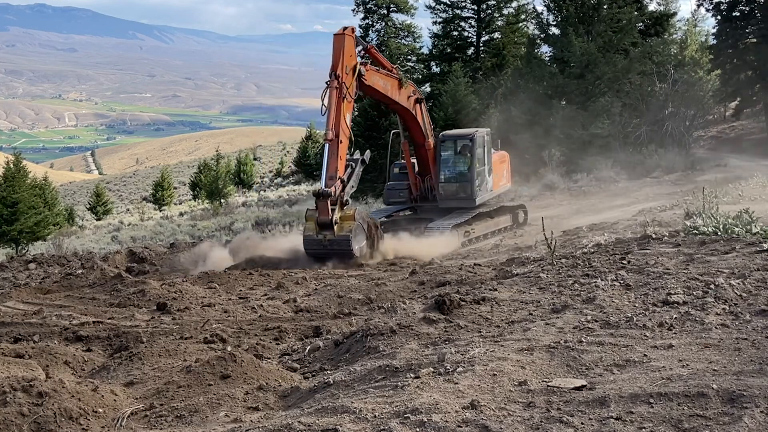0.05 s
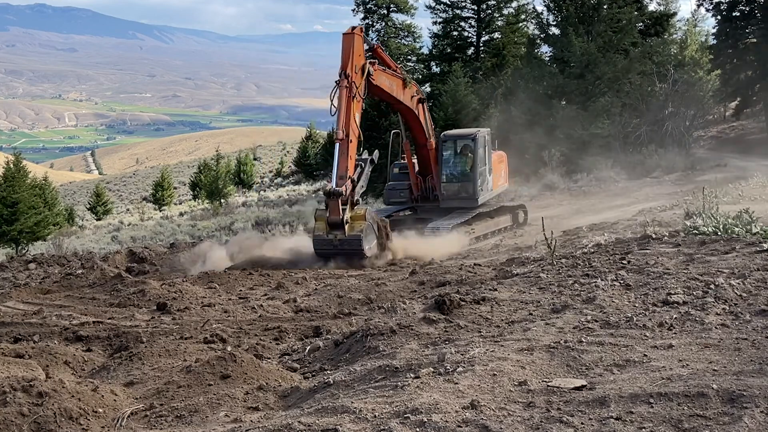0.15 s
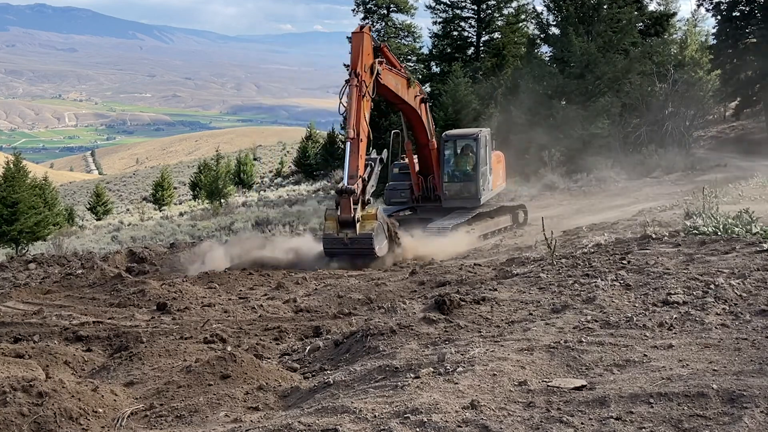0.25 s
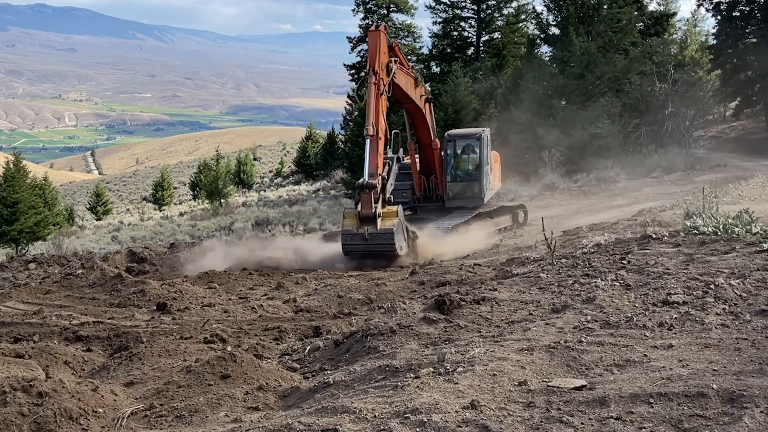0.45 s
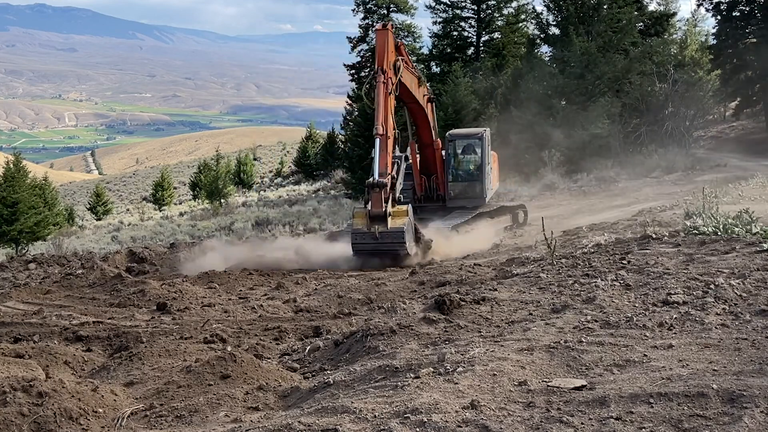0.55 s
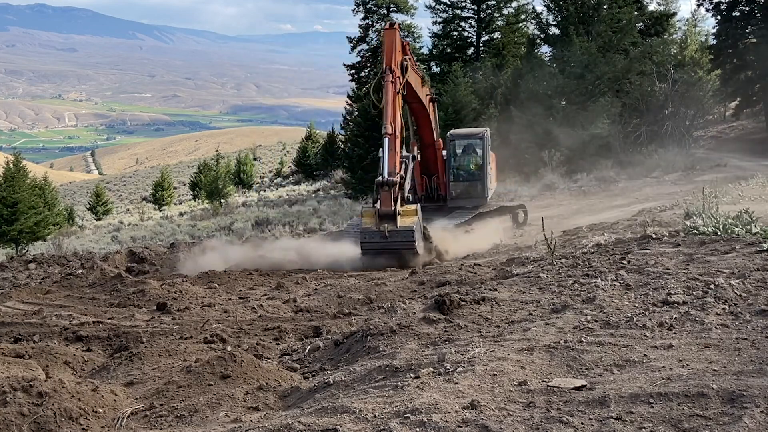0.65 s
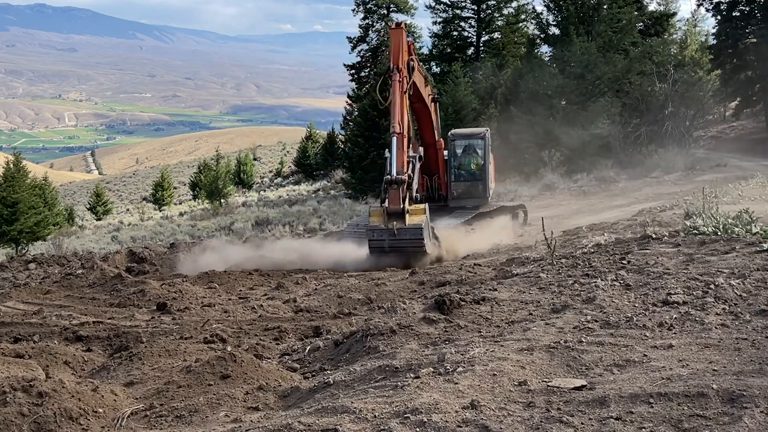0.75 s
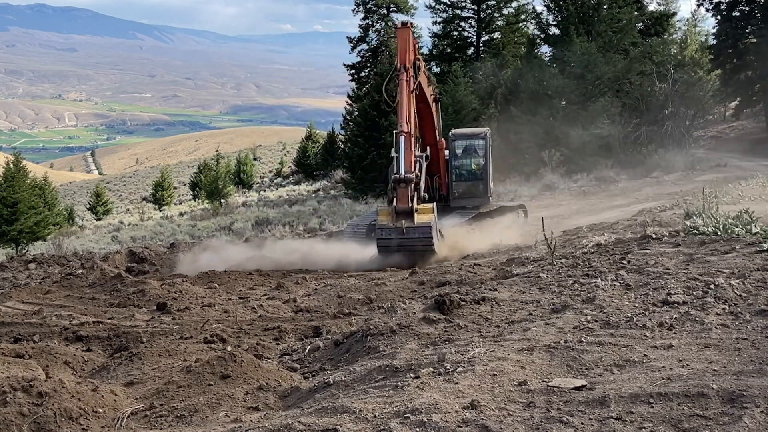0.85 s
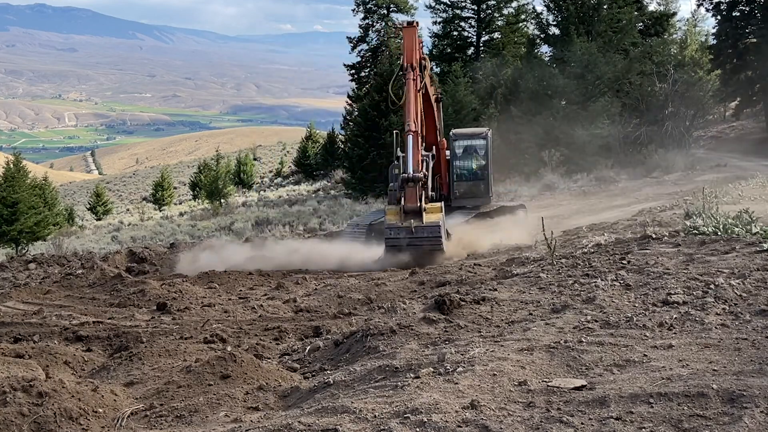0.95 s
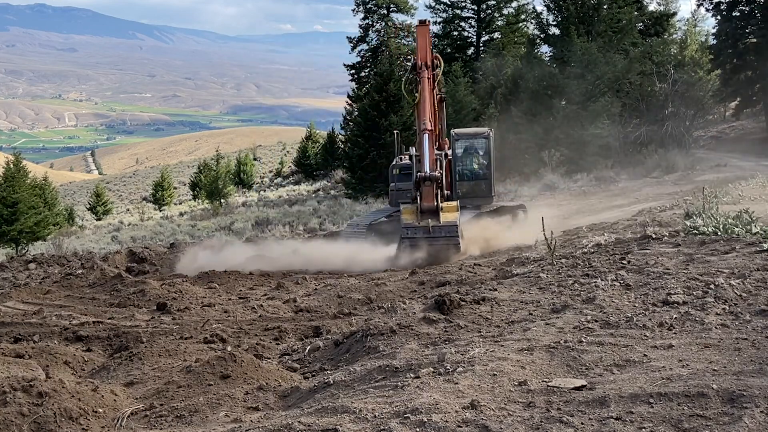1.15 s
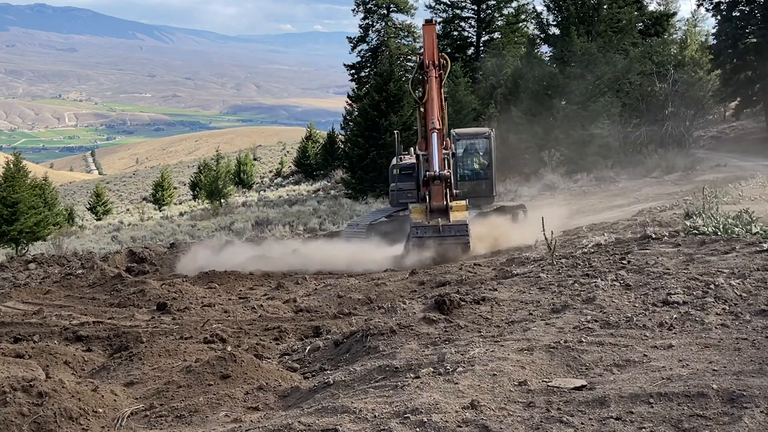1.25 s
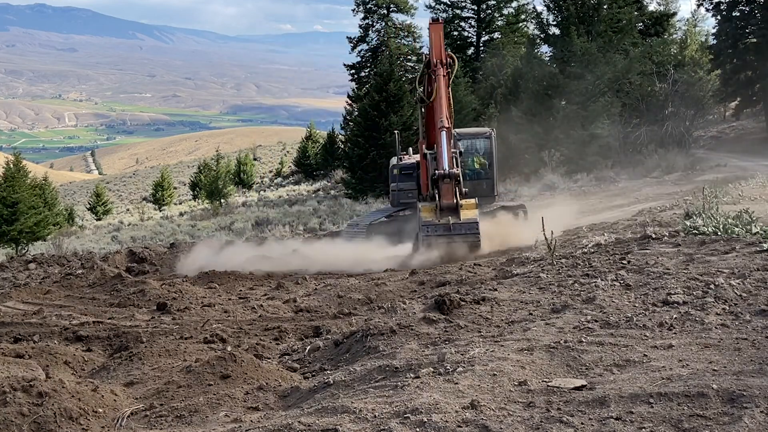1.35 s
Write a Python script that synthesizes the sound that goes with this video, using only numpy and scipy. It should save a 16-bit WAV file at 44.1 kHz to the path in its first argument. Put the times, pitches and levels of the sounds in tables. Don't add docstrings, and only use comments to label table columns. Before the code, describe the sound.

An excavator bucket scrapes stony soil: light gritty ticks, then a loud hollow clank and crunch, then overlapping knocks and grinding that thin out, over a faint diesel throb, heard outdoors from some distance.

```python
import sys
import numpy as np
from scipy import signal
from scipy.io import wavfile

SR = 44100
rng = np.random.default_rng(int(sys.argv[2]) if len(sys.argv) > 2 else 0)


def wrap_up_sound(samples):
    columns = np.atleast_2d(samples).T
    tamed = np.clip(columns, -1, 1)
    steps = np.round(tamed * 32767).astype(np.int16)
    wavfile.write(sys.argv[1], SR, steps)


def makeup_ratio(level_db):
    decades = np.asarray(level_db, float) / 20
    return 10 ** decades


N = 61739
TIME_S = np.arange(N) / SR


def rms_one(x):
    return x / np.sqrt(np.mean(x ** 2) + 1e-20)


def at_hz(points, hz):
    table_hz, value = np.transpose(points)
    return np.interp(np.log(hz), np.log(table_hz), value)


def drift(rate_hz):
    pole = np.exp(-2 * np.pi * rate_hz / SR)
    wander = signal.lfilter([1], [1, -2 * pole, pole ** 2], rng.standard_normal(N + SR))
    return rms_one(wander[SR:])


def ring(x, hz, t60_s):
    radius = makeup_ratio(-60 / (t60_s * SR))
    angle = 2 * np.pi * hz / SR
    poles = [1, -2 * radius * np.cos(angle), radius ** 2]
    return signal.lfilter([0, np.sin(angle)], poles, x + 1e-18)


def band_pass(low_hz, high_hz):
    return signal.butter(2, [low_hz, high_hz], "band", fs=SR, output="sos")


def bands(low_hz, count):
    edges_hz = low_hz * 2 ** (np.arange(count + 1) / 3)
    return [(np.sqrt(a * b), band_pass(a, b)) for a, b in zip(edges_hz, edges_hz[1:])]


def blow(since_s, rise_s, t60_s):
    attack = np.clip(since_s / rise_s, 0, 1) ** 0.68
    return attack * makeup_ratio(-60 * np.maximum(since_s - rise_s, 0) / t60_s)


def grains():
    grains_per_s, spread_db = 9000, 2.5
    size = makeup_ratio(spread_db * np.minimum(rng.exponential(1, N), 5))
    sign = rng.choice([-1, 1], N)
    return rms_one(size * sign * (rng.random(N) < grains_per_s / SR))


def knocks(rows, rise_cycles):
    start_s, level_db, pitch_hz, t60_s = np.array(rows).T[:, :, None]
    since_s = TIME_S - start_s
    envelope = makeup_ratio(level_db + 3.5) * blow(since_s, rise_cycles / pitch_hz, t60_s)
    return np.sum(envelope * np.sin(2 * np.pi * pitch_hz * since_s), axis=0)


# start_s, level_db, rise_s, tilt_db_per_octave, ring_db
STRIKES = [(0.063, -48, 0.0026, -2.5, -8), (0.111, -51, 0.0043, -2.5, -6), (.164, -83, 0.0047, -12, 0),
           (0.218, -37.5, 0.0012, 0, -8), (.24, -42, 0.0061, 3, -17), (0.259, -38, .005, 3, -17),
           (0.376, -46.5, 0.0014, -2, -22), (0.428, -38, 0.012, -6.5, -27), (.441, -27, 0.015, 3, -8),
           (0.477, -36, 0.011, -2.5, -3), (0.518, -42, 0.006, 2, -4), (0.587, -41, 0.02, -3, -6),
           (.605, -42, .02, -5, -6), (0.643, -33.5, 0.019, 1, -8), (0.69, -31.5, 0.0019, 1.5, -2.5),
           (0.719, -38, 0.0026, -4.5, -1.5), (.799, -37.5, 0.0066, 0.5, -12), (0.822, -37, 0.012, 1.5, -20),
           (0.843, -37, 0.0088, 1.5, 3.5), (0.868, -39, .01, .7, -9), (.913, -50, 0.004, 1, -12),
           (1.074, -42, 0.008, 4, -14), (1.115, -46, 0.0018, -.7, -14), (1.142, -52, .008, 2.5, -14),
           (1.172, -53, .01, -2, -10)]
# pitch_hz, level_db_per_hz
GRIT_COLOUR = [(150, -10), (450, -10.5), (720, -4.5), (1630, -10.5), (3650, -15.5), (4600, -33),
               (7200, -34), (15700, -86)]
# pitch_hz, t60_s
GRIT_DECAY = [(150, 0.52), (700, 0.62), (2500, 0.15), (6000, 0.23), (15000, 0.023)]


def grit():
    low_lag_rises_per_octave = 0.56
    tail_db, tail_dull_db_per_octave, tail_t60_s = -12.5, 0.5, 0.99
    air_loss_hz = 8890
    start_s, level_db, rise_s, tilt_db, _ = np.array(STRIKES).T[:, :, None]
    t = np.arange(0, N + 16, 16) / SR
    source = [grains(), grains()]
    out, power = 0, 0
    for k, (hz, sos) in enumerate(bands(145.4, count=21)):
        octaves = np.log2(hz / 1500)
        since_s = t - start_s - low_lag_rises_per_octave * rise_s * max(-octaves, 0)
        gain = makeup_ratio(level_db + tilt_db * octaves + rng.normal(0, 1.62, (len(STRIKES), 1)))
        burst = blow(since_s, rise_s, at_hz(GRIT_DECAY, hz))
        tail = makeup_ratio(tail_db - tail_dull_db_per_octave * octaves) * blow(since_s, rise_s + 0.0048, tail_t60_s)
        tail_power = tail ** 2 / (1 + (hz / air_loss_hz) ** 10.0)
        envelope = np.sqrt(np.sum(gain ** 2 * (burst ** 2 + tail_power), axis=0))
        band = makeup_ratio(at_hz(GRIT_COLOUR, hz)) * signal.sosfilt(sos, source[k % 2])
        out = out + band * np.interp(TIME_S, t, envelope) * makeup_ratio(1.55 * drift(32.0))
        power += np.mean(band ** 2)
    return out / np.sqrt(power)


# pitch_hz, level_db, t60_s
BUCKET_MODES = [(502, -12, 0.18), (536, -9, 0.16), (592.6, -4, 0.24), (711, -8, 0.18), (734, -16, 0.35),
                (789, -19, 0.3), (842, -9, 0.1), (968, -6, 0.17), (1114, -1, 0.072), (1262, -2, 0.13),
                (1456, -6.5, 0.14), (1555, -10.5, 0.15), (1683, -18, 0.087), (3693, -28, 0.16)]


def bucket():
    bucket_db = -25
    upper_db, upper_fall_db_per_octave, upper_t60_s = -14.5, 14, 0.051
    start_s, level_db, rise_s, tilt_db, ring_db = np.array(STRIKES).T[:, :, None]
    since_s = TIME_S - start_s
    rattle = grains() * makeup_ratio(level_db + ring_db + bucket_db)
    late = blow(since_s - 0.68 * rise_s, rise_s, 0.051) * rattle
    prompt = blow(since_s, rise_s, 0.05) * rattle
    out = np.zeros(N)
    strengths_db = rng.normal(0, 4.2, (len(STRIKES), len(BUCKET_MODES)))
    for k, (hz, mode_db, t60_s) in enumerate(BUCKET_MODES):
        out += ring(makeup_ratio(mode_db + strengths_db[:, k]) @ late, hz, t60_s)
    upper_hz = np.geomspace(1400, 9000, 40) * rng.uniform(.98, 1.02, 40)
    upper_strengths_db = rng.normal(0, 3, (len(STRIKES), 40)).T
    for hz, strength_db in zip(upper_hz, upper_strengths_db):
        slope_db = (tilt_db[:, 0] - upper_fall_db_per_octave) * np.log2(hz / 1800)
        drive = makeup_ratio(upper_db + slope_db + strength_db) @ prompt
        out += ring(drive, hz, upper_t60_s * (1800 / hz) ** 0.41)
    return out


# start_s, level_db, pitch_hz, t60_s
CLANKS = [(.062, -42, 559, 0.068), (.062, -51, 702, 0.14), (.066, -49.5, 1250, .1),
          (.068, -51.5, 735, 0.47), (.118, -45, 777, 0.14), (.125, -45, 739.5, 0.87),
          (.217, -36, 555, 0.078), (.217, -41, 718, 0.099), (.245, -45.5, 734, 1.13),
          (.262, -40, 1940, .06), (.222, -43, 1150, .12), (.268, -45.5, 592.7, 0.33),
          (.466, -28.5, 708, 0.14), (.443, -35, 1040, .08), (.445, -33.5, 1487, 0.13),
          (.447, -34, 1921, .12), (.453, -31.5, 1156, 0.12), (.458, -34.5, 983, 0.19),
          (.456, -35, 522, 0.063), (.468, -31.5, 532, 0.27), (.478, -29, 843, 0.15),
          (.488, -31.5, 786, .12), (.512, -37, 927, .1), (.512, -34.5, 715, 0.093), (.552, -36, 668, 0.17),
          (.585, -39.5, 504, 0.078), (.592, -44, 778, 0.18), (.603, -35.5, 670, 0.087),
          (.608, -40.5, 1258, 0.36), (.6, -43, 983, 0.21), (.655, -38.5, 1028, .15),
          (.671, -36.5, 557, 0.12), (.69, -37.5, 1856, 0.18), (.69, -44.5, 1120, 0.21),
          (.815, -42, 1312, 0.25), (.845, -39, 998, .1), (.866, -37.5, 910, 0.11), (.87, -39, 673, 0.14),
          (.872, -42.5, 1396, 0.14), (.872, -41, 1262, 0.13), (.71, -34, 540, 0.088),
          (.903, -41, 733, 0.48), (.84, -43, 602, .15), (.93, -47, 546, 0.17), (.915, -45, 778, 0.14),
          (1.122, -44, 1114, 0.15), (1.118, -46.5, 1820, 0.1)]


def clanks():
    return knocks(CLANKS, rise_cycles=0.74)


# start_s, level_db, pitch_hz, t60_s
THUDS = [(0.261, -42, 217.7, 0.17), (0.357, -38.5, 85, 0.25), (.456, -25.5, 248, 0.078),
         (.464, -24, 264, 0.051), (.454, -29.5, 154, 0.1), (0.459, -35.5, 80, 0.3),
         (.472, -31.5, 300, 0.23), (.53, -38, 197, 0.083), (.452, -32.5, 374, 0.094),
         (0.54, -35.5, 80, 0.21), (.585, -33, 89, 0.19), (0.641, -32, 207, 0.11), (0.691, -30.5, 99, 0.1),
         (0.69, -27.5, 256, 0.063), (0.716, -29.5, 288, 0.1), (0.809, -36.5, 76.6, 0.26),
         (0.843, -30.5, 262, 0.054), (.863, -29.5, 250, 0.063), (.85, -29, 192.5, 0.095),
         (0.884, -32, 148, 0.093), (1.2, -41, 195.6, 0.16), (1.078, -46, 312, 0.08),
         (0.12, -46.5, 290, 0.09), (0.29, -44, 330, 0.065), (1.158, -40.5, 215, 0.062),
         (1.13, -46.5, 307, .15), (.8, -39, 160, 0.11)]


def thuds():
    return knocks(THUDS, rise_cycles=0.9)


# start_s, level_db, centre_hz, t60_s
CRACKS = [(.261, -36, 2600, 0.045), (0.224, -45.5, 2800, 0.12), (.652, -44, 3460, 0.12),
          (.712, -41, 2200, .07), (.441, -30, 1650, 0.16), (0.453, -28.5, 2130, 0.1),
          (0.61, -44.5, 2600, 0.065), (0.94, -49, 2800, 0.13), (1.2, -67, 8200, 0.085),
          (.845, -43, 2900, 0.067), (.803, -47, 2400, .06), (0.4, -55, 5600, .3), (1.117, -46, 2100, 0.032)]


def cracks():
    source, out = grains(), 0
    for start_s, level_db, centre_hz, t60_s in CRACKS:
        burst = rms_one(signal.sosfilt(band_pass(centre_hz / 1.56, centre_hz * 1.454), source))
        out = out + makeup_ratio(level_db) * blow(TIME_S - start_s, 0.0047, t60_s) * burst
    return out


# start_s, length_s, pitch_hz, level_db
SQUEAKS = [(.232, .014, 6100, -58), (.245, .03, 6800, -57), (.245, .008, 10400, -66),
           (.453, .008, 7000, -50), (.53, .012, 6000, -63), (.652, .03, 7600, -65),
           (.655, .025, 14700, -78), (.655, .016, 10500, -69), (.703, .035, 9750, -66),
           (.805, .015, 15200, -80), (.845, .11, 9750, -72), (.918, .022, 13500, -84),
           (1.08, .02, 7700, -64), (.692, .012, 7200, -58), (.71, .07, 3700, -56), (.85, .04, 3700, -58),
           (.755, .03, 3700, -60), (1.08, .03, 5400, -63), (1.118, .01, 7200, -65), (.46, .02, 3100, -42)]


def squeaks():
    width_hz = 200
    t60_s = np.log(1000) / (np.pi * width_hz)
    out = 0
    for start_s, length_s, pitch_hz, level_db in SQUEAKS:
        noise = rng.standard_normal(N)
        tone = rms_one(ring(ring(noise, pitch_hz, t60_s), pitch_hz, t60_s))
        grip = np.clip((TIME_S - start_s) / .002, 0, 1)
        release = np.clip((start_s + 1.2 * length_s - TIME_S) / length_s, 0, 1)
        out = out + makeup_ratio(level_db + 2) * tone * grip * release
    return out


# start_s, level_db
LOAD = [(0, -49.5), (0.041, -52), (.08, -47), (.19, -67), (.27, -41), (.33, -52), (.45, -46), (.65, -45),
        (.85, -43.5), (1.0, -42), (1.05, -47), (1.24, -45.5), (1.275, -47), (1.32, -43.5), (1.4, -45.5)]
# multiple_of_firing, level_db
EXHAUST = [(1, 0), (2, -9), (3, -11), (4, -18), (5, -17)]


def exhaust():
    firing_hz, firing_jitter, firing_spread_db = 58.63, 0.015, 1
    rate_hz = firing_hz * (1 + firing_jitter * drift(6.47))
    phase = 2 * np.pi * (np.cumsum(rate_hz) / SR + .2)
    pulse = np.zeros(N)
    for order, level_db in EXHAUST:
        pulse -= makeup_ratio(level_db + firing_spread_db * drift(23)) * np.cos(order * phase)
    load_db = np.interp(TIME_S, *np.transpose(LOAD))
    return np.sqrt(2) * makeup_ratio(load_db) * pulse


# pitch_hz, level_db_per_hz
WASH = [(21, -31), (35, -7), (75, -3.5), (113, -9.5), (188, -11.5), (269, -15), (1970, -36.5),
        (14000, -68.5), (15500, -89)]


def wash():
    wash_db, settle = -46, 4000
    white = rng.standard_normal((2, N + settle))
    out = 0
    for k, (hz, sos) in enumerate(bands(32.5, count=27)):
        band = signal.sosfilt(sos, white[k % 2])[settle:]
        out = out + makeup_ratio(at_hz(WASH, hz) + 1.4 * drift(21)) * band
    return makeup_ratio(wash_db) * rms_one(out)


def scene():
    rumble_cut = signal.butter(4, 47, "high", fs=SR, output="sos")
    digging = grit() + bucket() + clanks() + thuds() + cracks() + squeaks()
    return (signal.sosfilt(rumble_cut, digging + wash()) + exhaust())[None]


def roll_off(x):
    return signal.sosfilt(signal.butter(12, 15700, fs=SR, output="sos"), x)


def record(dry):
    headroom, cutoff_hz = .3, 15760
    rounded = headroom * np.tanh(dry / headroom)
    top_cut = signal.cheby2(20, 50, cutoff_hz, fs=SR, output="sos")
    return roll_off(signal.sosfilt(top_cut, rounded))


dry = scene()
out = record(dry)
wrap_up_sound(out)
```